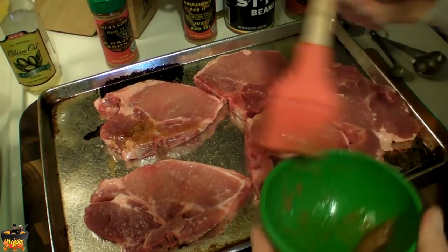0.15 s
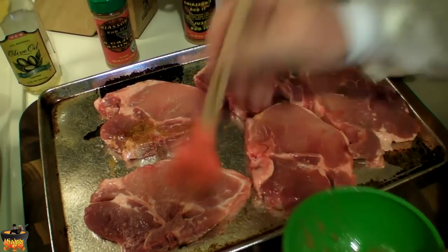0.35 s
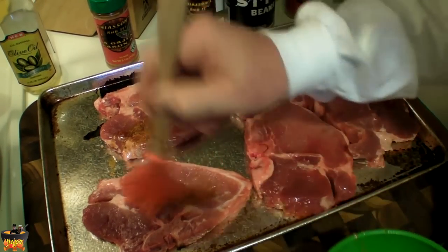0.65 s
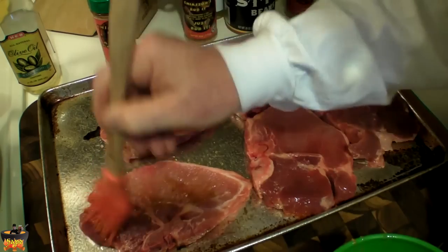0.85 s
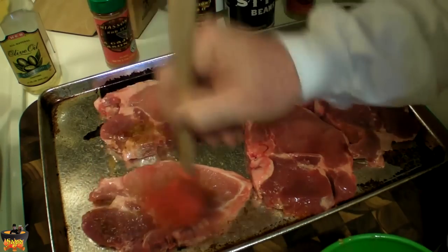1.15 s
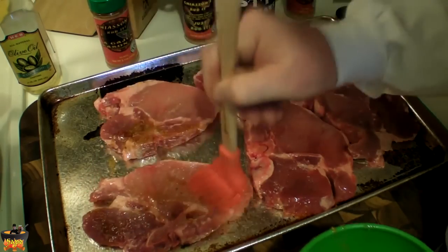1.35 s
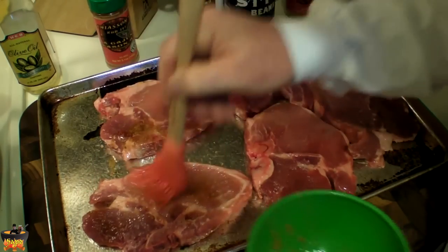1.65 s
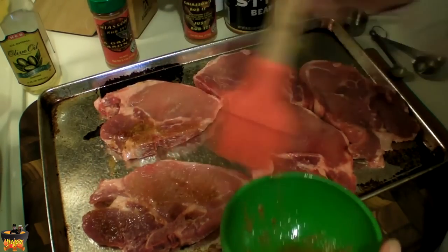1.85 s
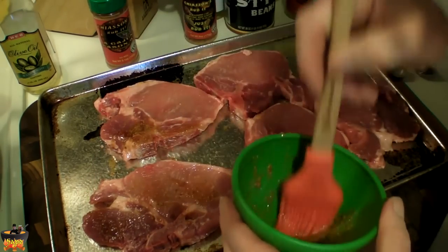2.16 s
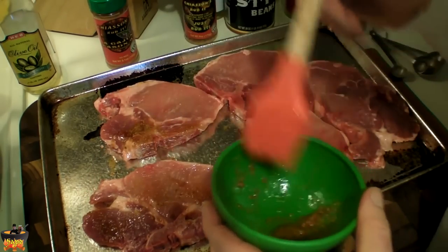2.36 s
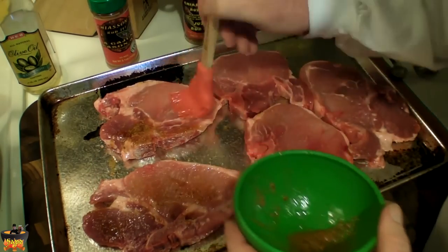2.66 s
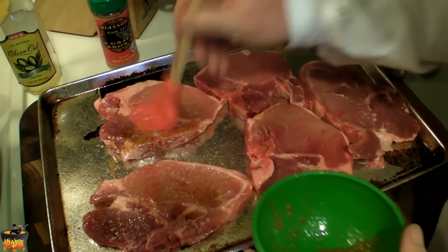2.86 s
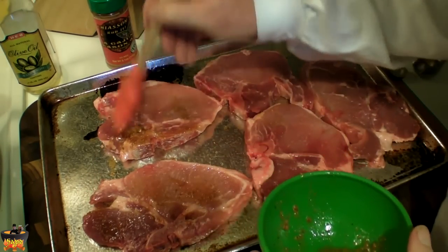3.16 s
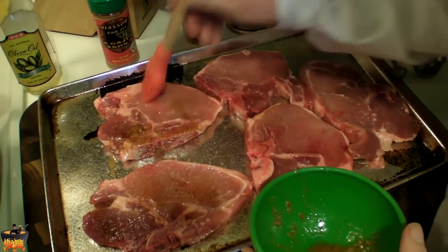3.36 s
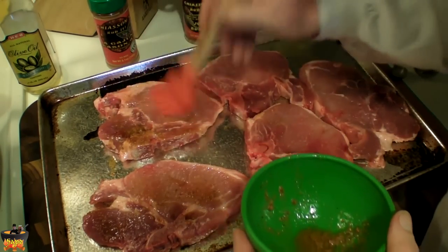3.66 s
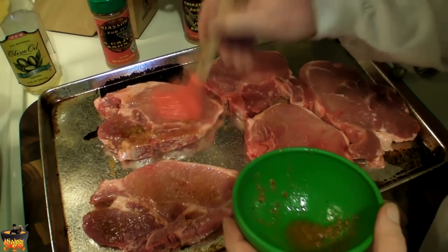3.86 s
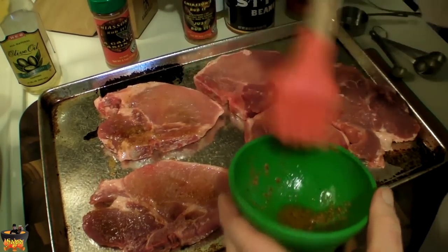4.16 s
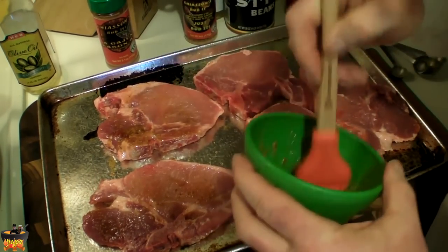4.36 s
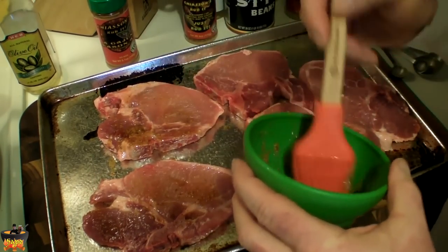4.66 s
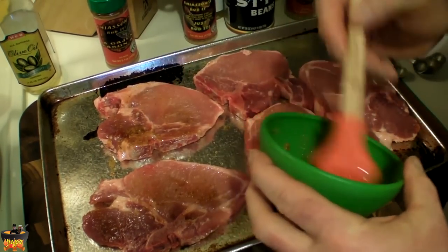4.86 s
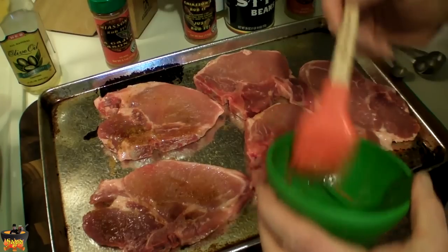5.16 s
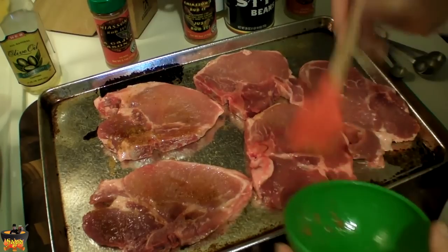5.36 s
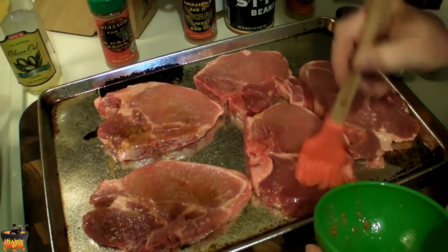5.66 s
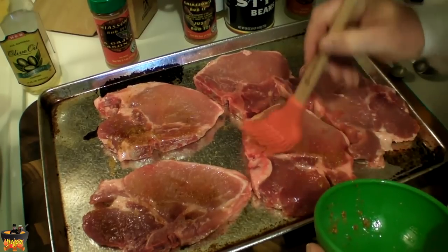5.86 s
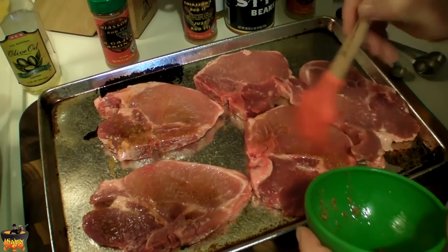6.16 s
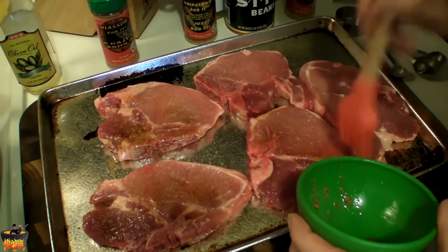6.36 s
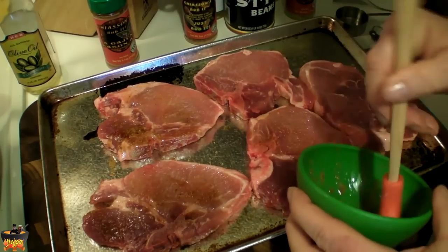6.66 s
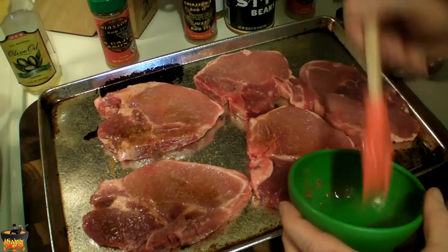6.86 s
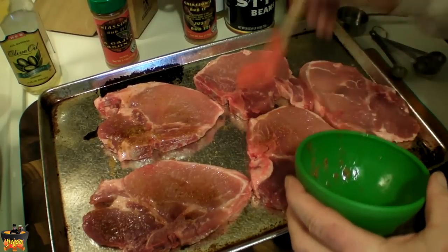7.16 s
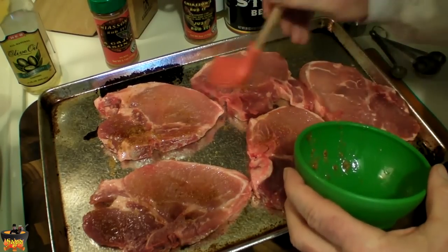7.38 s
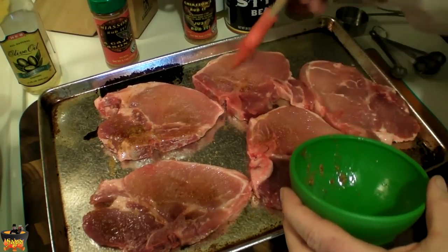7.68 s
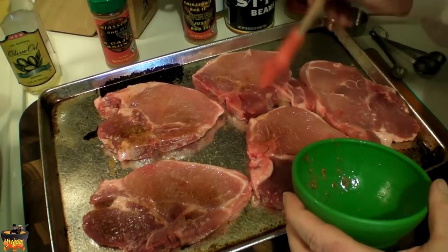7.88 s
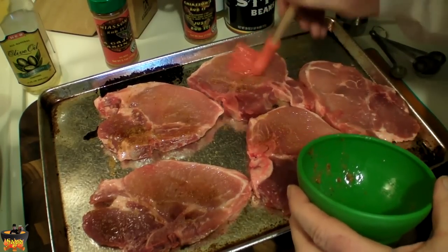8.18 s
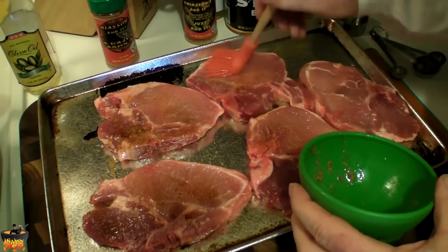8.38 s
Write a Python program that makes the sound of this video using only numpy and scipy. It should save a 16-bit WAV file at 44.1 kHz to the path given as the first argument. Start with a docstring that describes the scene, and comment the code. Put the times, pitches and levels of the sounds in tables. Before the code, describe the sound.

Sharp, wet slaps of a basting brush on raw chops, with sticky bristle crackle and soft bowl scrapes, close up in a small hard kitchen.

```python
"""A small hard kitchen, miked close in stereo: a silicone brush is loaded in a plastic bowl and slapped over
raw chops on a sheet-metal tray. Each slap is a pressure pulse with a ringing crack, near echoes and room tail.
Wet bristles hiss and crackle as crowds of tiny ringing film ruptures, and smack as short rings with noise.
The bowl knocks dully in a few damped cycles; below lie a fridge's two wavering hum tones, rumble and hiss."""
import sys
import numpy as np
from scipy import signal
from scipy.fft import rfft, irfft, next_fast_len
from scipy.io import wavfile

SR = 44100
rng = np.random.default_rng(int(sys.argv[2]) if len(sys.argv) > 2 else 0)


def put_to_file(sound):
    """Save the sound as 16-bit audio at rate SR, in the file named by the first command-line argument."""
    columns = np.atleast_2d(sound).T  # one column per channel
    safe = np.clip(columns, -1, 1)
    whole_steps = np.round(safe * 32767)
    wavfile.write(sys.argv[1], SR, whole_steps.astype(np.int16))


N = 375803   # length in samples

# Flat slaps of the brush head. Each row: start in seconds, level in dB, contact in ms,
# relative ring level in dB, relative send to the room in dB.
SLAPS = [(1.3967, -7, 0.7, 2, -5.5), (2.6611, -21, 1.22, -4, 0), (2.9009, -7.5, 0.57, 0.5, -6.5),
         (3.0941, -9.5, 0.42, 12, -2.5), (3.2864, -3.2, 0.27, -2, -9.5), (3.4909, -3.5, 0.24, -1.5, -8),
         (3.711, -1.3, 0.19, -2.5, -10.5), (3.8957, -1.5, 0.21, -9, -9.5), (5.4485, -21.5, 1.12, -17, 0.5),
         (5.847, 0, 0.13, -7.5, -10.5), (6.0511, 1, 0.17, -10.5, -12), (6.2755, -2, 0.17, -3.5, -10),
         (7.1957, -3.5, 0.19, -1, -5.5), (7.4033, 2, 0.11, -6.5, -11), (7.579, -0.6, 0.2, -9, -11.5),
         (7.7903, 1.5, 0.14, -6.5, -12), (7.9781, -23, 1.18, -4, 4), (8.1849, 0.5, 0.16, -11.5, -12),
         (8.3836, 0.8, 0.12, -4.5, -10.5)]
# Dabs that land, press and peel off again. Each row: start in seconds, landing level in dB, pressed time
# in seconds, delay to the peel in seconds, peel level in dB, low part of the landing in dB against its level.
DABS = [(0.377, -38.5, 0.017, 0.076, -53.5, -1.5), (0.58, -43.5, 0.037, 0.084, -50.5, -7),
        (0.78, -44.5, 0.035, 0.091, -48.5, -4), (0.976, -43, 0.01, 0.075, -50, 2),
        (1.16, -44.5, 0.036, 0.1, -49, -3.5), (1.363, -54.5, 0.019, 0.079, -51.5, 10),
        (1.575, -48, 0.056, .105, -49, 2), (2.632, -49.5, .01, 0.081, -60, 4),
        (2.855, -45.5, 0.037, 0.084, -51, 1), (3.063, -38, 0.024, 0.079, -48, -1),
        (3.26, -42.5, 0.016, 0.088, -48, 1), (3.462, -35.5, 0.021, 0.083, -50.5, 1.5),
        (3.682, -36, 0.029, 0.085, -44, -1), (3.87, -34.5, 0.024, 0.074, -43, 1),
        (5.214, -41, 0.02, 0.048, -64, -17.5), (5.395, -46.5, 0.0079, 0.083, -56, -6),
        (5.631, -44, .04, 0.076, -52.5, 2), (5.817, -36.5, 0.038, 0.095, -47.5, 0),
        (6.032, -41.5, 0.022, .085, -46, 11.5), (6.242, -40, 0.043, 0.07, -45.5, 0),
        (7.179, -38.5, .025, 0.075, -45.5, 2.5), (7.384, -31, 0.021, 0.099, -45, 0),
        (7.565, -49.5, 0.018, 0.098, -45, 16.5), (7.765, -42.5, 0.037, 0.12, -48, 4.5),
        (7.983, -43.5, 0.021, 0.057, -48, -7), (8.17, -35.5, .02, 0.095, -44.5, 7),
        (8.364, -36, 0.017, 0.11, -43, 2)]


def slaps():
    """One pressure pulse per slap, wide when soft; heard directly, off near surfaces and through the room."""
    body, crack, push = np.zeros((3, 2, N))
    pan_db = 1.6
    # each slap lands elsewhere, so part of the room answer is new
    spot = rng.uniform(-1.17, 1.105, (len(SLAPS), 3))
    for (s, db, contact_ms, ring_db, room_db), shift in zip(SLAPS, spot):
        phase = 7 * np.arange(700) / SR / (contact_ms / 1000)
        pulse = phase ** 2 * np.exp(2 - phase) / 4
        thump = filtered(np.roll(pulse, 6) - 0.13 * pulse, hz=397, kind="high")
        pocket = air_pocket(shift[1], shift[2])
        ring = filtered(np.convolve(pulse, pocket)[:700] / pulse.sum(), hz=600, kind="high")
        # the sharp edge: one pitch left, another right, duller when contact is long
        edge = np.array([burst(hz, t60=0.0015, size=700) for hz in (10000, 11800)])
        edge = amp(-7.5 - 20.0 * contact_ms) * edge
        add(body, s, amp(db) * panned(thump, pan_db))
        add(crack, s, amp(db) * panned(edge - amp(ring_db + 3) * ring, pan_db))
        direction = [np.cos(shift[0]), np.sin(shift[0])]   # shares sent to two room answers
        add(push, s, amp(db + room_db + 24.0) * np.outer(direction, pulse / pulse.sum()))
    body = filtered(body, hz=5000, kind="low")
    near = near_echoes(body, crack)
    return filtered(body + crack + near, hz=260, kind="high"), push


def air_pocket(pitch_shift, level_shift):
    """Air trapped under the brush head rings at three damped pitches, varying from slap to slap."""
    crack_hz, crack_t60_s = 3400, 0.0055
    ring = burst(crack_hz * (1 + 0.022 * pitch_shift), crack_t60_s, size=400)
    ring = ring + amp(1 + 15.0 * level_shift) * burst(1.125 * crack_hz, crack_t60_s, size=400)
    return ring + amp(-5.0) * burst(5100, t60=0.003, size=400)


def near_echoes(body, crack):
    """Tray, worktop and tiles return each slap within milliseconds, with slightly new delays and levels."""
    # Reflections off tray, worktop and tiles. Each row: nominal delay in seconds, nominal gain as a factor.
    reflections = [(.0011, -0.13), (.00142, 0.88), (.0026, -0.43), (.0035, 0.06), (.0039, -0.53),
                   (.0052, -0.09), (.0063, -0.38), (.007, .4), (0.012, -0.4), (0.0095, 0.27),
                   (0.0159, 0.49)]
    delay_spread, level_spread_db = 0.1216, 4   # share of the delay; dB
    near = np.zeros((2, N))
    # the crack is beamed forward, so little of it echoes
    source = filtered(body, hz=2300, kind="low") + amp(-14.0) * filtered(crack, hz=5000, kind="low")
    for s, *_ in SLAPS:
        start = round(s * SR)
        sound = source[:, start:start + 1000]
        variations = rng.uniform(-1, 1, (len(reflections), 2))
        for (lag_s, gain), (late, loud) in zip(reflections, variations):
            echo = gain * amp(level_spread_db * loud) * sound
            add(near, s + lag_s * (1 + delay_spread * late), echo)
    return near


def drag():
    """Sticky crackle of the paste as the bristles land, squirt it out in a slap and peel off."""
    # Spectrum of the crackle. Each row: frequency in Hz, relative density in dB per Hz.
    colour = [(710, 27.5), (1200, -5), (1570, -3), (2590, -3), (3500, -1.5), (5000, -3), (6870, -4.5),
              (8170, -6), (14200, -8), (15300, -12), (16000, -26)]
    land_rise_s, land_fall_s = 0.015, 0.027   # time for 20 dB
    s, db, pressed_s, after_s, peel_db, low_db = np.transpose(DABS)
    slap_s, slap_db = np.transpose(SLAPS)[:2]
    land_high = strokes(s, db, land_rise_s, pressed_s, land_fall_s)
    land_low = strokes(s, db + low_db, land_rise_s, pressed_s, land_fall_s)
    peel = strokes(s + after_s, peel_db, rise_s=0.07, hold_s=0.013, fall_s=0.063)
    splash = strokes(slap_s, slap_db - 31.5, rise_s=0.006, hold_s=0, fall_s=0.0057)
    crackle = grains(per_s=5000., spread_db=-1.0, cycles=10.6, low_hz=1220, high_hz=15900, patchy_db=1.5)
    low, high = split(tint(crackle, colour), hz=6500)
    high_gain = land_high + peel + splash
    low_gain = land_low + amp(-4.5) * peel + amp(11) * splash
    return high * high_gain + low * low_gain


def smacks():
    """Each smack is a click ringing briefly with a spray of noise around its pitch; small ones crowd every peel."""
    # Louder wet smacks of bristle tips landing or peeling off.
    # Each row: start in seconds, relative level in dB, pitch in Hz.
    loud = [(0.0748, -32, 4800), (0.384, -19, 8550), (0.582, -30.5, 7900), (0.598, -23.5, 7900),
            (0.6623, -40, 8700), (0.6791, -36.5, 3550), (0.7809, -37, 12000), (0.7928, -32.5, 3020),
            (0.8035, -30, 6500), (0.8213, -24.5, 6340), (0.8627, -29, 6000), (0.8797, -39, 11000),
            (0.9907, -26, 5000), (1.05, -26, 5600), (1.1603, -31.5, 10600), (1.1828, -28, 9400),
            (1.191, -29, 8200), (1.2712, -32.5, 10100), (1.361, -35, 11200), (1.5806, -26.5, 9300),
            (1.609, -29, 6760), (1.6466, -44, 9000), (1.674, -32, 6640), (1.701, -38, 11200),
            (2.104, -43, 6500), (2.632, -33, 10500), (2.859, -23.5, 7300), (2.9608, -32, 8560),
            (3.4634, -15, 4930), (3.6816, -21.5, 7340), (3.8708, -11, 6900), (3.961, -36, 8100),
            (4.285, -19.5, 5360), (4.5433, -20, 4900), (4.78, -20.5, 5600), (4.966, -37, 5600),
            (5.009, -24, 6400), (5.186, -34, 4560), (5.215, -32, 6500), (5.233, -28.5, 7900),
            (5.394, -34, 7400), (5.652, -28, 5240), (5.6642, -30, 4700), (5.8163, -27, 7000),
            (6.243, -26, 6350), (6.597, -22.5, 5650), (6.9466, -35, 4220), (7.1806, -28, 9200),
            (7.6784, -39, 5400), (7.7673, -25, 10300), (7.9854, -27, 6060), (8.0053, -36, 8800),
            (8.0573, -30, 7000), (8.075, -34.5, 7200), (8.1666, -29, 7300), (8.2617, -31, 5900),
            (8.3663, -17, 8900)]
    small = []
    for s, _, _, after_s, peel_db, _ in DABS:
        for _ in range(3):
            start_s = s + after_s + 0.046 * rng.standard_normal()
            small.append((start_s, peel_db + 6.5 + rng.normal(0, 4.0), rng.uniform(4900, 10000)))
    out, t = np.zeros((2, N)), np.arange(1500) / SR
    onset = 1 - np.exp(-t / 0.0002)
    noise_fade = amp(-60 * t / 0.0088)
    for s, db, hz in loud + small:
        noise = rng.standard_normal((2, 1500))
        pan_db = rng.normal(-2, 4)
        # part of the left noise is shared by both sides
        spray = filtered(noise[0] + 0.5 * noise, [0.5 * hz, min(1.26 * hz, 16000)], kind="band")
        smack = (1.9 * burst(hz, t60=10.0 / hz) + 1.13 * spray * noise_fade) * onset
        add(out, min(s, N / SR), amp(db) * panned(smack, pan_db))
    return out


def sweep():
    """Dense slips of bristles pushed round the bowl wall, nearly a hiss, cut short where the brush lifts."""
    # Pushes round the bowl. Each row: start in seconds, level in dB, rise in seconds per 20 dB,
    # hold in seconds, fall in seconds per 20 dB, treble in dB against the level.
    pushes = [(2.032, -38.5, 0.0089, 0.057, 0.085, 0.5), (2.216, -49, 0.032, .01, 0.026, 12),
              (4.278, -39, 0.018, 0.092, 0.088, 1.5), (4.532, -32.5, 0.046, 0.013, 0.089, 2),
              (4.724, -38.5, 0.01, 0.013, 0.055, 0), (4.771, -34, 0.028, 0.014, 0.13, 1.5),
              (4.958, -41.5, 0.023, 0.0087, 0.024, 4.5), (4.99, -31.5, 0.0071, 0.008, 0.098, 2),
              (6.602, -35, 0.025, .005, 0.017, 1), (6.636, -37.5, 0.031, 0.032, 0.071, 2),
              (6.769, -43, 0.075, 0.023, 0.16, 2.5), (6.985, -52, 0.041, 0.018, 0.032, 1.5)]
    # Spectrum of the slips. Each row: frequency in Hz, relative density in dB per Hz.
    colour = [(350, -54), (600, -16), (1140, -6), (1680, -15), (2150, -8.5), (2700, -7), (3400, 0),
              (4400, -2), (5600, -5.5), (8160, -10.5), (13000, -14.5), (15400, -17), (16000, -34)]
    # Brush resting on the bowl wall. Each row: start in seconds, end in seconds.
    on_wall = [(2.0, 2.193), (4.25, 4.36), (4.43, 4.78), (4.7, 4.83), (4.92, 5.1), (6.56, 6.75),
               (6.93, 7.2)]
    lift_s = 0.04   # 20 dB are lost in this time as the bristles leave the wall
    s, db, rise_s, hold_s, fall_s, treble_db = np.transpose(pushes)
    slips = grains(per_s=8000., spread_db=0.5, cycles=8.1, low_hz=836, high_hz=14200, patchy_db=2.0)
    low, high = split(tint(slips, colour), hz=6500)
    start_s, end_s = np.transpose(on_wall)
    contact = np.minimum(strokes(start_s, 0, lift_s, end_s - start_s, lift_s), 1)
    low_gain = strokes(s, db, rise_s, hold_s, fall_s)
    high_gain = strokes(s, db + treble_db, rise_s, hold_s, fall_s)
    return contact * (low * low_gain + high * high_gain)


def taps():
    """Soft plastic knocks, two damped rings a few cycles long, that swell for a moment."""
    # Dull taps of the bowl against hand and tray.
    # Each row: start in seconds, relative level in dB, lower pitch in Hz.
    knocks = [(0.079, -34, 1210), (1.373, -18, 1440), (1.697, -43, 108), (1.745, -31, 372),
              (2.219, -43.5, 514), (2.316, -39, 435.3), (2.354, -38, 440), (2.68, -34, 385),
              (0.985, -37, 1180), (1.185, -35, 1510), (1.215, -43, 560), (4.76, -39.5, 396),
              (6.991, -45, 3500)]
    out = np.zeros(N)
    swell = 1 - np.exp(-np.arange(4000) / SR / 0.0023)
    for s, db, hz in knocks:
        ring = burst(hz, t60=11.7 / hz, size=4000)
        ring = ring + 0.29 * burst(1.42 * hz, t60=18.0 / hz, size=4000)
        add(out, s, amp(db + 4.5) * swell * ring)
    return out


def kitchen_response():
    """Dense reflections off hard walls: noise that swells in a few ms and dies band by band."""
    # Spectrum of the room answer. Each row: frequency in Hz, relative density in dB per Hz.
    colour = [(35, -38), (90, -22), (135, -5.5), (205, -3), (240, -9.5), (285, -10.5), (372, 4.5),
              (526, -6.5), (855, 0.5), (1150, -5), (1300, 2.5), (1520, -1), (2590, 1.5), (3300, 1.5),
              (4000, 1), (5500, -3), (8040, -14.5), (13400, -6), (15000, -29)]
    # Reverberation. Each row: frequency in Hz, time to fall 60 dB in seconds.
    decay = [(120, 0.3), (230, 0.23), (360, 0.35), (530, 0.38), (1390, 0.35), (3680, 0.34), (9700, 0.12)]
    # Stereo width of the room. Each row: frequency in Hz, left-right likeness from 0 to 1.
    likeness = [(60, 1), (180, 0.95), (550, 0.94), (1650, 0.85), (4970, 0.46), (15000, 0.08)]
    t = np.arange(SR // 2) / SR
    dying = sum(band * amp(-60 * t / at_hz(decay, hz)) for hz, band in bands(len(t), colour, likeness))
    dying = dying * (1 - np.exp(-(t / 0.0068) ** 2))
    return dying / np.sqrt(np.sum(dying ** 2, axis=1, keepdims=True))


def background():
    """Fridge rumble with two hum tones whose phase wanders, and steady hiss."""
    # Spectrum of rumble and hiss. Each row: frequency in Hz, relative density in dB per Hz.
    colour = [(18, -57), (30, -12), (81, -4.5), (109, 4), (259, -8), (384, 2), (760, -7), (2680, -14),
              (3770, -15.5), (7470, -17), (8080, -25.5), (9710, -20), (11700, -42), (14400, -22),
              (16000, -53)]
    # Stereo width of rumble and hiss. Each row: frequency in Hz, left-right likeness from 0 to 1.
    likeness = [(60, 0.79), (180, 0.65), (550, 0.18), (1650, 0.38), (4970, 0.128), (15000, 0.04)]
    # Fridge hum. Each row: frequency in Hz, width in Hz, rms level in dB.
    hum = [(114.3, 2.43, -60.5), (92.4, 4.14, -64)]
    floor = sum(band for _, band in bands(N + N % 2, colour, likeness))
    out = amp(-53.5) * rms_one(floor)[:, :N]
    for hz, width_hz, db in hum:
        # the phase walks at random
        wander = np.cumsum(rng.standard_normal(N)) * np.sqrt(2 * np.pi * width_hz / SR)
        out = out + amp(db) * np.sqrt(2) * np.sin(2 * np.pi * hz * np.arange(N) / SR + wander)
    return out


def grains(per_s, spread_db, cycles, low_hz, high_hz, patchy_db):
    """Tiny film ruptures of varied size at random moments; each rings a few cycles at one of 14 pitches."""
    sizes = amp(spread_db * np.minimum(rng.exponential(1, (2, N)), 5)) * rng.choice([-1, 1], (2, N))
    # bristles let go in bunches
    clumps = amp(3.0 * rms_one(filtered(rng.standard_normal(N), hz=36, kind="low")))
    mid, side = sizes * (rng.random((2, N)) < clumps * per_s / SR)
    clicks = mid + 0.67 * side * [[1], [-1]]
    dealt, out = rng.integers(0, 14, N), 0
    patch_samples = 600
    patches = rng.standard_normal((14, N // patch_samples + 1))   # each pitch comes and goes on its own
    clicks = clicks * amp(patchy_db * patches[dealt, np.arange(N) // patch_samples])
    for k, hz in enumerate(np.geomspace(low_hz, high_hz, 14)):
        r, w = amp(-60 * hz / (cycles * SR)), 2 * np.pi * hz / SR
        resonance = [1 - r * r, 0, r * r - 1, 1, -2 * r * np.cos(w), r * r]
        # twice: a wet, soft start
        out = out + signal.sosfilt([resonance, resonance], clicks * (dealt == k) + 1e-18)
    return out


def strokes(s, db, rise_s, hold_s, fall_s):
    """Summed gain of strokes that rise, hold and fall, straight in dB; rise and fall are times for 20 dB."""
    t = np.arange(0, N + 32, 32)[:, None] / SR - s
    fade = np.maximum(-t / rise_s, 0) + np.maximum((t - hold_s) / fall_s, 0)
    return np.interp(np.arange(N) / 32, np.arange(len(t)), amp(db - 20 * fade).sum(axis=1))


def burst(hz, t60, size=1500):
    """A damped ring of height 1."""
    t = np.arange(size) / SR
    wave = np.sin(2 * np.pi * hz * t) * amp(-60 * t / t60)
    return wave / np.abs(wave).max()


def bands(length, colour, likeness):
    """Stereo noise in overlapping half-octave-spaced bands that add up to the colour: yields Hz and the band."""
    hz = np.linspace(1, SR / 2, length // 2 + 1)
    mid, side = rfft(rng.standard_normal((2, length))) * amp(at_hz(colour, hz))
    alike = np.clip(at_hz(likeness, hz), 0, 1)
    pair = np.sqrt(1 + alike) * mid + np.sqrt(1 - alike) * side * [[1], [-1]]
    for centre in 28 * 2 ** np.arange(0, 9.6, .5):
        weight = np.clip(1 - 2 * np.abs(np.log2(hz / centre)), 0, 1)
        yield centre, irfft(pair * weight, length)


def tint(x, colour):
    """Shapes the spectrum of x by a table; rms 1."""
    hz = np.linspace(1, SR / 2, N // 2 + 1)
    return rms_one(irfft(rfft(x) * amp(at_hz(colour, hz)), N))


def at_hz(points, hz):
    """Reads a table at hz, straight between points on a log frequency axis."""
    table = np.array(points)
    return np.interp(np.log(hz), np.log(table[:, 0]), table[:, 1])


def split(x, hz):
    """Parts of x below and above hz."""
    low = signal.sosfiltfilt(signal.butter(2, hz, fs=SR, output="sos"), x)
    return low, x - low


def filtered(x, hz, kind, order=2):
    """Butterworth filter."""
    return signal.sosfilt(signal.butter(order, hz, kind, fs=SR, output="sos"), x)


def convolve(x, response):
    """Sound x answered by a response, cut to the scene's length."""
    size = next_fast_len(N + response.shape[-1])
    return irfft(rfft(x, size) * rfft(response, size), size)[..., :N]


def panned(sound, pan_db):
    """Stereo sound, louder left by pan_db."""
    return sound * amp([[pan_db / 2], [-pan_db / 2]])


def add(out, s, sound):
    """Mixes sound into out at s seconds."""
    i = round(s * SR)
    out[..., i:i + sound.shape[-1]] += sound[..., :N - i]


def amp(db):
    """Amplitude factor of a level in dB."""
    return 10 ** (np.asarray(db) / 20)


def rms_one(x):
    """Scales x to rms 1."""
    return x / np.sqrt(np.mean(x ** 2) + 1e-20)


def scene():
    """Slaps, brush and bowl up close, their room answer, and the fridge behind."""
    direct, push = slaps()
    brush, knocks = drag() + sweep() + smacks(), taps()
    wet = amp(1.5) * filtered(brush.mean(axis=0), hz=9000, kind="high") + amp(-16) * knocks
    room = convolve(push[0] + wet, kitchen_response()) + convolve(push[1], kitchen_response())
    return direct + brush + knocks + room + background()


def record(dry):
    """The loudest cracks overload the input, which rounds them off; the treble above 16.4 kHz is cut."""
    clipped = dry / (1 + np.abs(dry) ** 6) ** (1 / 6)
    return signal.sosfilt(signal.cheby2(12, 60, 16400, fs=SR, output="sos"), clipped)


dry = scene()
out = record(dry)
put_to_file(out)
```